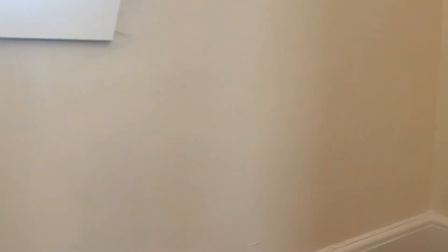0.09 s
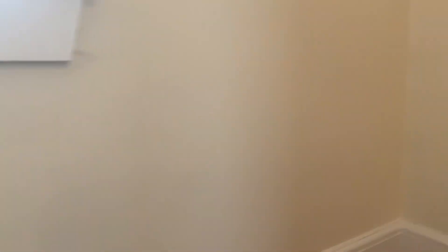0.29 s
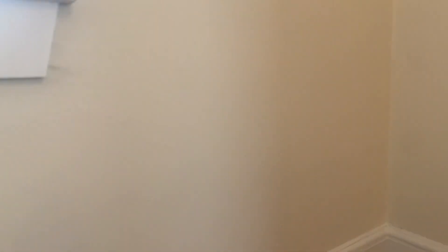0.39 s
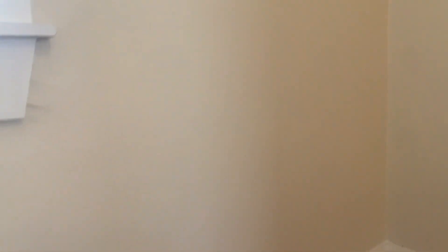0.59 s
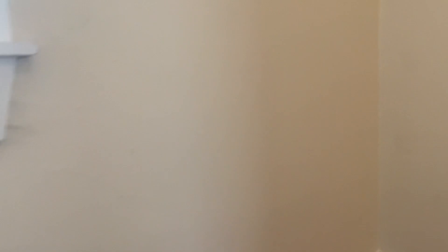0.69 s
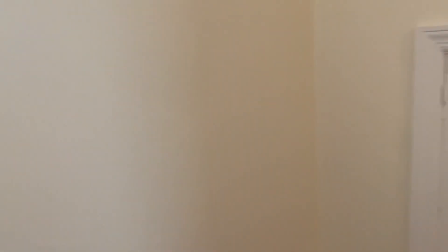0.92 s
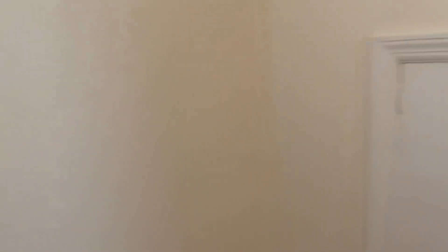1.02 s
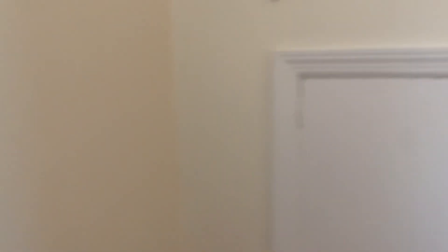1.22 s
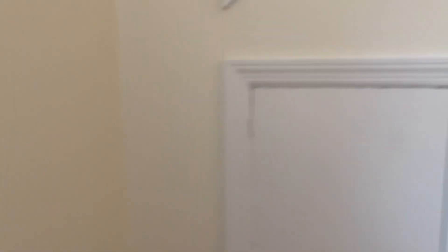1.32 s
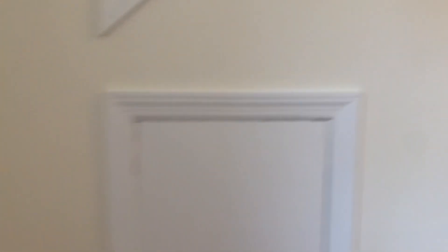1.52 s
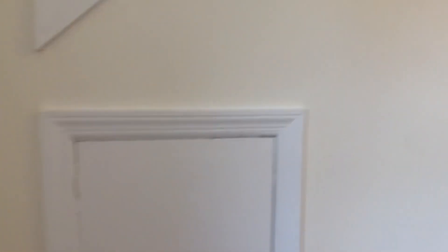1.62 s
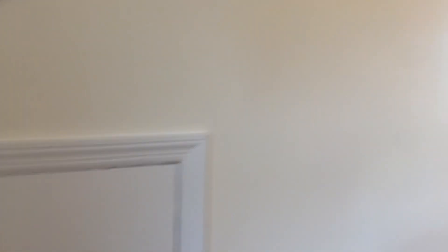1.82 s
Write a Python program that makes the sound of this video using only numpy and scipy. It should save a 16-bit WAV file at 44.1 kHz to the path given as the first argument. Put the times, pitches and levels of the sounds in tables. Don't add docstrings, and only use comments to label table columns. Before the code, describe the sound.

A strap buckle bumps the handheld case in a fast clattering double knock; after a near-quiet gap, shoes scuff and thud up wooden treads, ending in a crisp heel clack, with short empty-house reverberation.

```python
import sys
import numpy as np
from scipy import signal
from scipy.fft import rfft, irfft
from scipy.io import wavfile
from scipy.ndimage import map_coordinates

SR = 44100
rng = np.random.default_rng(int(sys.argv[2]) if len(sys.argv) > 2 else 0)


def to_wav(sig):
    pcm = np.clip(np.atleast_2d(sig), -1, 1) * 32767
    pcm = np.round(pcm).astype(np.int16)
    wavfile.write(sys.argv[1], SR, pcm.T)


def boost_factor(decibels):
    exponent = np.asarray(decibels, float) / 20
    return 10 ** exponent


N = 83790
T = np.arange(N) / SR
HZ = np.fft.rfftfreq(N, 1 / SR)

# (frequency [Hz], side over mid [dB])
NEAR_WIDTH = [(60, -9.7), (200, -10), (380, -5), (700, -2.5), (1290, 0), (2380, 1), (4400, -1), (8120, 4)]
# (frequency [Hz], side over mid [dB])
ROOM_WIDTH = [(60, -33), (110, -17), (200, -17), (380, -6.5), (700, -2.5), (1290, -2.5), (2380, 0.5),
              (4400, -1), (8120, -1.5), (15000, -1)]


def curve(table, hz=HZ):
    table = np.array(table, float)
    return np.interp(np.log(hz + 1), np.log(table[:, 0]), table[:, 1])


def colour(x, db):
    gain = boost_factor(db)
    return irfft(rfft(x) * gain / np.sqrt(np.mean(gain ** 2)), N)


def humps(peaks):
    return sum(boost_factor(db) / np.sqrt(1 + (2 * (HZ - hz) / width) ** 2) for hz, width, db in peaks)


def walk(rate):
    return map_coordinates(rng.standard_normal(size=1000), [T * rate], mode="mirror")


def ring(hits, modes, rise):
    t = T[:SR // 3]
    response = sum(boost_factor(db - 60 * t / t60) * np.sin(2 * np.pi * hz * t) for hz, db, t60 in modes)
    response = response * (1 - np.exp(-(t / rise) ** 2))
    impulses = np.zeros(N)
    for at, db in hits:
        impulses[int(at * SR)] += boost_factor(db)
    return signal.fftconvolve(impulses, response)[:N]


def wide(db, width):
    mid = colour(rng.standard_normal(N), db)
    side = colour(rng.standard_normal(N), db)
    return np.array([mid, irfft(rfft(side) * boost_factor(curve(width)), N)])


def room_hush():
    # (frequency [Hz], density [dB per Hz])
    hush_colour = [(18, -31), (40, -7), (120, -16), (400, -9.5), (2500, -21), (5500, -29), (10000, -34.5),
                   (16000, -33.5)]
    # (time [s], level [dB])
    hush_swell = [(0, 0), (.12, -1), (.16, -12.5), (.22, -2), (.3, 2), (.5, -2), (.65, 0.5), (.8, -1.5),
                  (1.15, 1), (1.6, 1), (1.9, 2.5)]
    level = -64.5 + np.interp(T, *np.array(hush_swell).T) + 0.5 * walk(6.2)
    return boost_factor(level) * wide(curve(hush_colour), ROOM_WIDTH)


def hand_grip():
    # (time [s], level [dB])
    grip_level = np.array([(0, -61.5), (.06, -51.5), (0.139, -58.5), (.2, -60.5), (.33, -60), (.45, -62),
                           (.6, -59), (0.679, -57.5), (.74, -63.5), (0.801, -65), (.86, -52.5), (.93, -63),
                           (1.17, -60.5), (1.25, -62), (1.32, -58), (1.45, -43.5), (1.63, -60.5),
                           (1.9, -59.5)])
    # (frequency [Hz], density [dB per Hz])
    grip_colour = [(20, -30), (32, -5), (48, 11.5), (100, 4), (200, -9), (400, -33.5)]
    level = np.interp(T, grip_level[:, 0], grip_level[:, 1]) + 2 * walk(29.79)
    return boost_factor(level) * colour(rng.standard_normal(N), curve(grip_colour))


def sole_steps():
    # (time [s], tread [dB], scuff [dB], grit [dB], contact [s])
    landings = [(.000, -77.5, -79, -86.5, 0.012), (.042, -56, -59, -89, 0.019),
                (0.089, -84, -74, -83, 0.012), (.42, -58.5, -64, -96, 0.041),
                (.478, -60.5, -81, -96, 0.011), (.535, -60, -76, -87, 0.026),
                (.898, -62, -49, -61.5, 0.0052), (0.907, -42.5, -53.5, -55.5, 0.023),
                (0.941, -55, -60, -64.5, 0.025), (0.973, -50.5, -56, -61.5, 0.025),
                (1.183, -46.5, -54, -60, 0.01), (1.193, -44.5, -53.5, -60.5, 0.043),
                (1.251, -42.5, -45, -65, 0.02), (1.31, -52, -47.5, -65, 0.036),
                (1.351, -46, -57.5, -82.5, 0.042), (1.400, -54, -43.5, -48.5, 0.013),
                (1.412, -51.5, -39.5, -46.5, 0.018), (1.438, -45.5, -49, -65.5, 0.013),
                (1.491, -60, -45.5, -52, 0.011), (1.650, -64.5, -64, -91, 0.046)]
    # (frequency [Hz], level [dB], t60 [s])
    tread_modes = [(118.6, -1, 0.29), (166.1, 2, 0.17), (182.7, -2, 0.15), (262.5, -4, 0.18),
                   (289.4, 4, 0.14), (330.8, -4, 0.21), (437.5, -14, 0.25), (502, -10, 0.1)]
    # (time [s], level [dB])
    clacks = [
        (.0420, -67),
        (1.4115, -35.5),
        (1.4190, -45.5),
        (1.4900, -52),
    ]
    # (frequency [Hz], level [dB], t60 [s])
    nosing_modes = [(294, 2.5, 0.089), (762.3, 3.5, 0.083), (1042, -11, 0.16), (1367, -4.5, 0.039),
                    (2261, -7, 0.062), (4760, -9, 0.049)]
    # (frequency [Hz], density [dB per Hz])
    scuff_colour = [(200, -32), (380, 6), (560, 2.5), (780, -6.5), (1700, -8.5), (3500, -17), (7000, -23),
                    (16000, -74)]
    # (frequency [Hz], width [Hz], level [dB])
    scuff_peaks = [(1050, 62, 3), (1476, 190, 7), (2236, 170, 4), (2960, 160, -31)]
    # (frequency [Hz], density [dB per Hz])
    grit_colour = [(1500, 3), (3200, 4.5), (4500, 4.5), (7000, -0.5), (11000, -4), (16000, -11.5)]

    force = np.zeros((2, N))
    for at, _, scuff_db, grit_db, contact in landings:
        t = T[:SR // 5] / contact
        press = 2 * t ** .5 * np.exp(.5 - 2 * t)
        force[:, int(at * SR):][:, :len(t)] += boost_factor(np.array([[scuff_db], [grit_db]])) * press
    scuff, grit = force * rng.standard_normal((2, N)) * boost_factor(2.34 * walk(300))
    scuff_db = curve(scuff_colour) + 20 * np.log10(1 + humps(scuff_peaks))
    treads = ring([(s[0], s[1] + 1.5) for s in landings], tread_modes, 0.005)
    nosing = ring(clacks, nosing_modes, 0.0013)
    return treads + nosing + colour(grit, curve(grit_colour)) + colour(scuff, scuff_db)


def stairwell(x):
    # (frequency [Hz], t60 [s])
    hall_t60 = [(60, 0.16), (250, 0.39), (1000, 0.47), (4000, 0.59), (12000, 0.069)]
    build_s, hall_db = 0.0056, 2.5
    tail = 0
    for hz in 40 * 2 ** np.arange(0, 8.6, .5):
        octaves = np.log2((HZ + 1) / hz)
        band = rfft(rng.standard_normal((2, N))) * np.exp(-(octaves / .3) ** 2)
        t60 = curve(hall_t60, hz)
        tail = tail + irfft(band, N) * boost_factor(-60 * T / t60) / np.sqrt(t60 * SR / np.log(1e6))
    tail = tail * (1 - np.exp(-T / build_s))
    tail = rfft(tail) * np.array([np.ones(len(HZ)), boost_factor(curve(ROOM_WIDTH))])
    return signal.fftconvolve(x[None], irfft(tail, N), axes=1)[:, :N] * boost_factor(hall_db)


def strap_rub():
    # (start [s], length [s], level [dB])
    slides = [
        (0.215, .068, -69.5),
        (.313, 0.029, -70),
        (0.341, 0.0098, -62.5),
        (0.353, 0.034, -58.5),
    ]
    rub = sum(boost_factor(db) * np.sin(np.pi * np.clip((T - at) / length, 0, 1)) for at, length, db in slides)
    rub = rub * boost_factor(2 * walk(195.5))
    resonance = humps([(6220, 1900, 0)])
    return rub * wide(40 * np.log10(resonance), NEAR_WIDTH)


def cracking_grains():
    crack_s = [.2185, .9120, 1.4012, 1.4016, 1.4118, 1.4128, 1.4140, 1.4160, 1.4200, 1.4340, 1.4540]
    # (frequency [Hz], level [dB], t60 [s])
    grain_modes = [(542, -47, 0.17), (2330, -44, 0.025), (4490, -40, 0.014), (10170, -40, 0.01),
                   (7030, -36.5, 0.017), (4074.1, -51, 0.011), (1260, -37, .03), (2270, -42, 0.047),
                   (5400, -40.5, 0.018), (4620, -48, 0.033), (6400, -52, 0.013)]
    return sum(ring([(at, db)], [(hz, 0, t60)], .0006) for at, (hz, db, t60) in zip(crack_s, grain_modes))


def buckle_knocks():
    # (time [s], level [dB], length [s])
    thuds = [
        (0.2425, -11, 0.056),
        (0.295, -41, 0.12),
        (0.364, -19, 0.029),
        (0.374, -30, 0.061),
        (0.473, -42.5, 0.031),
        (0.533, -49.5, 0.035),
        (1.275, -36, 0.044),
        (1.31, -37, .07),
        (1.412, -45, 0.063),
    ]
    # (time [s], shell [dB], lid [dB], tick [dB])
    taps = [
        (.2420, -11, -21.5, -19.5),
        (.2880, -46, -49, -24.5),
        (.2918, -50, -48, -34),
        (.3630, -25, -17, -26),
        (.3648, -44, -16, -39.5),
        (.3690, -25.5, -21, -28.5),
        (.3735, -27.5, -31, -54),
        (.3770, -33, -42, -37),
        (.3830, -44, -28, -32.5),
    ]
    # (time [s], level [dB])
    rebounds = [
        (.2880, -25.5),
        (.2918, -14),
        (.2958, -20),
    ]
    # (frequency [Hz], level [dB], t60 [s])
    rebound_modes = [(190, -6.5, .02), (469, 1, 0.029), (657, -9, 0.025), (880, -17, 0.0205),
                     (1330, -28.5, .045), (1680, -25, 0.013), (2360, -34, 0.01)]
    shell_modes = [(509, 1.5, .022), (873, -10.5, 0.019), (1607, -26.5, 0.011)]
    lid_modes = [(581.7, -5.5, 0.057), (705, -12.5, 0.031), (297, -2.5, 0.031), (1330, -13.5, 0.016)]
    tick_modes = [(1043, 10.5, 0.006), (1720, -6, 0.011), (2335, -12, 0.005)]
    snap_modes = [(4920, -10.5, 0.0098), (6330, 2, 0.0075), (6800, 0.5, 0.006), (7310, -6.5, 0.0071)]
    rise = 0.00085

    out = np.zeros(N)
    for at, thud_db, length in thuds:
        t = np.arange(1, int(length * SR)) / SR
        turns = 36 * t + .72 * np.log(t / .00112)
        swell = np.sin(np.pi * (t / length) ** .7) * (1 - np.exp(-(t / 0.0012) ** 2))
        out[int(at * SR):][:len(t)] += boost_factor(thud_db) * swell * np.cos(2 * np.pi * turns)
    out += ring(rebounds, rebound_modes, rise)
    out += ring([(at + 0.00087, shell) for at, shell, _, _ in taps], shell_modes, rise)
    out += ring([(at + 0.00097, lid) for at, _, lid, _ in taps], lid_modes, rise)
    out += ring([(at, tick) for at, _, _, tick in taps], tick_modes, rise)
    out += ring([(at, -37.5 + 2.6 * (tick + 20)) for at, _, _, tick in taps], snap_modes, .0001)
    return out


def sleeve_rustle():
    # (time [s], level [dB])
    rustle_level = np.array([(.5, -116), (.56, -96), (.64, -79), (.72, -65.5), (.80, -70), (.87, -80),
                             (.92, -54)])
    # (frequency [Hz], density [dB per Hz])
    rustle_colour = [(500, -29), (1000, -1.5), (2500, -8), (5000, -7.5), (7000, -10.5), (10000, -12.5),
                     (16000, -24)]
    level = np.interp(T, rustle_level[:, 0], rustle_level[:, 1], -99, -99) + 0.73 * walk(51)
    return boost_factor(level) * wide(curve(rustle_colour), ROOM_WIDTH)


def heel_jolts():
    # (time [s], low [dB], creak [dB])
    pushes = [
        (1.2582, -20, -39),
        (1.2838, -23, -61),
        (1.297, -31.5, -40),
        (1.313, -30.5, -29),
        (1.322, -24, -32),
        (1.3460, -32, -60),
    ]
    # (frequency [Hz], level [dB], t60 [s])
    low_modes = [(157.7, 4, 0.057), (215.4, 0.5, 0.026), (122, -25, 0.079)]
    # (frequency [Hz], level [dB], t60 [s])
    creak_modes = [(1310, -1, 0.029), (1470, -7, 0.028), (630, 1, 0.015)]
    low = ring([(at, low_db) for at, low_db, _ in pushes], low_modes, 0.003)
    creak = ring([(at - 0.00202, creak_db) for at, _, creak_db in pushes], creak_modes, 0.0014)
    return creak - low


def scene():
    # (frequency [Hz], angle [rad])
    near_lean = [(120, 0.036), (300, -0.039), (600, -0.14), (1200, 0.15), (2400, -0.43), (5000, -0.81),
                 (9000, 0)]
    soles = sole_steps()
    near = hand_grip() + soles + cracking_grains() + buckle_knocks() + heel_jolts()
    quarter_turn = -1j * np.exp(1j * curve(near_lean))
    near_side = irfft(rfft(near) * quarter_turn * boost_factor(curve(NEAR_WIDTH)), N)
    diffuse = room_hush() + stairwell(soles) + strap_rub() + sleeve_rustle()
    mid, side = diffuse + np.array([near, near_side])
    return np.array([mid + side, mid - side])


def top_cut(x):
    return signal.sosfilt(signal.butter(12, 16610, fs=SR, output="sos"), x)


def record(dry):
    # (frequency [Hz], gain [dB])
    mic_gain = [(7300, 0), (8300, -11), (9200, -10), (9700, 0), (12400, -2), (12800, -30), (14100, -26),
                (14600, -2)]
    response = boost_factor(curve(mic_gain)) * (HZ < 15800)
    mix = irfft(rfft(dry) * response, N)
    return top_cut(mix)


dry = scene()
out = record(dry)
to_wav(out)
```